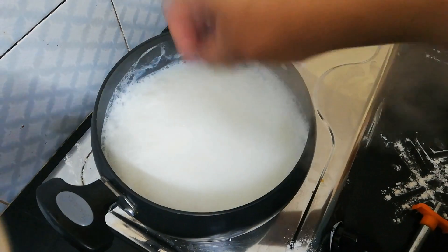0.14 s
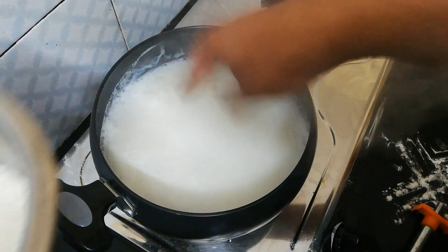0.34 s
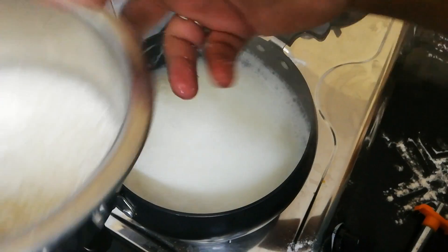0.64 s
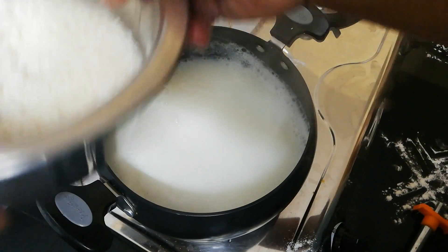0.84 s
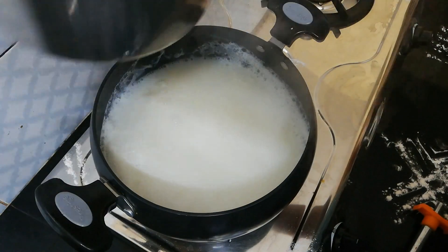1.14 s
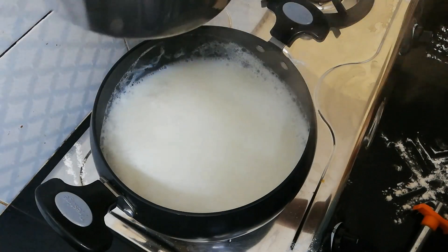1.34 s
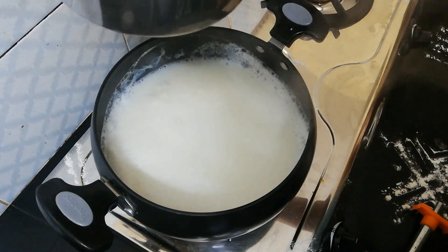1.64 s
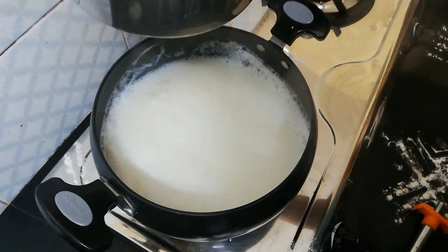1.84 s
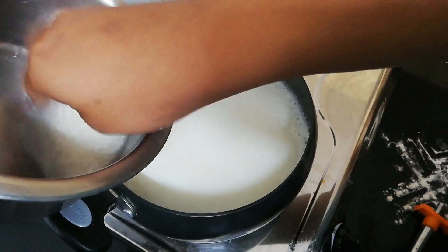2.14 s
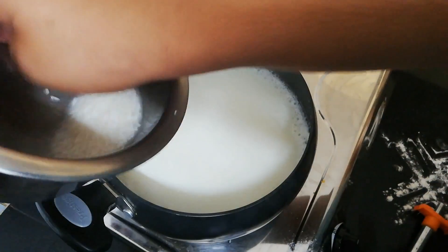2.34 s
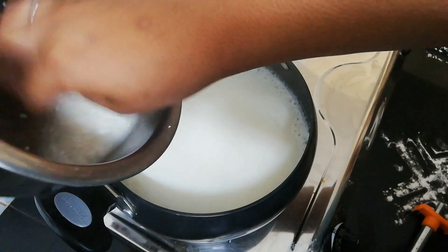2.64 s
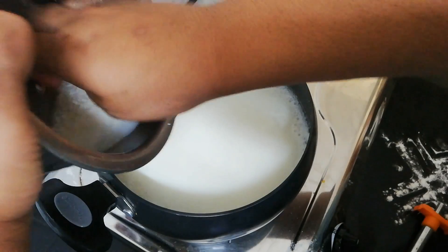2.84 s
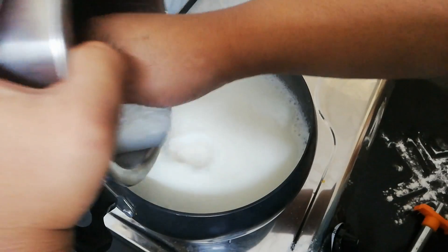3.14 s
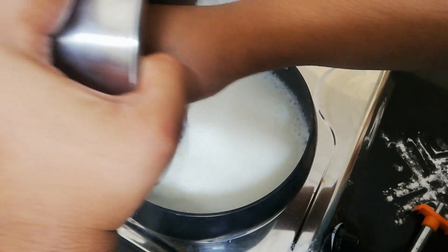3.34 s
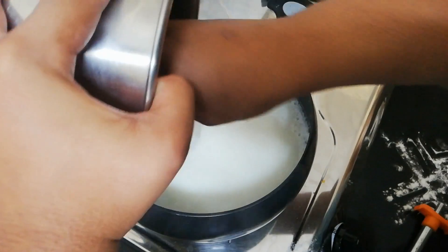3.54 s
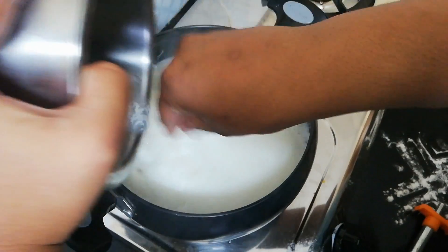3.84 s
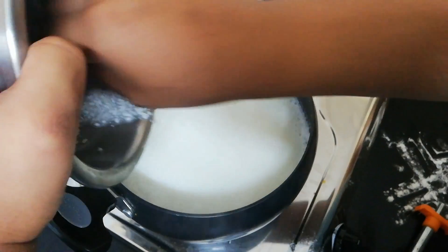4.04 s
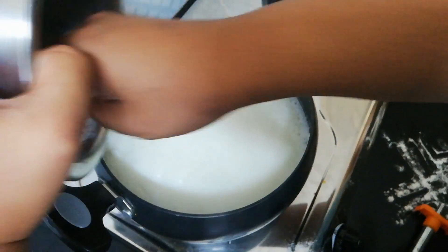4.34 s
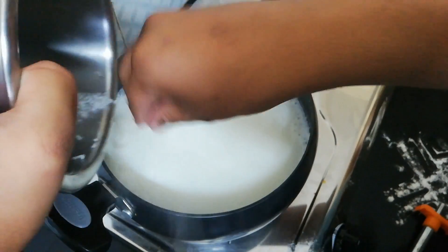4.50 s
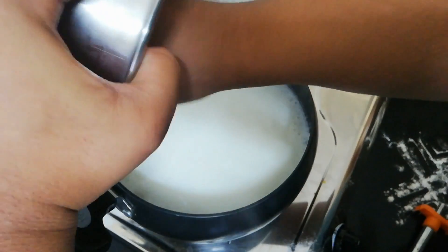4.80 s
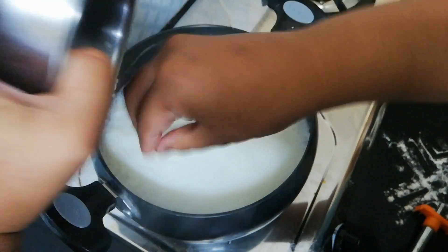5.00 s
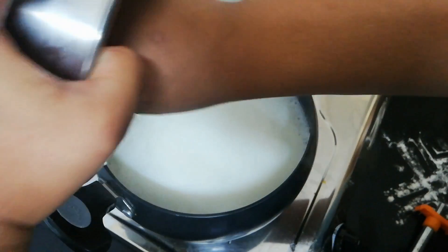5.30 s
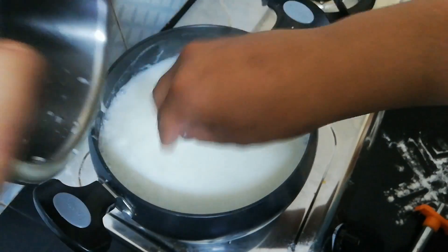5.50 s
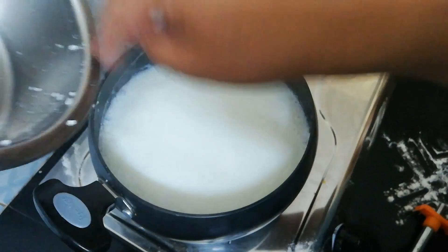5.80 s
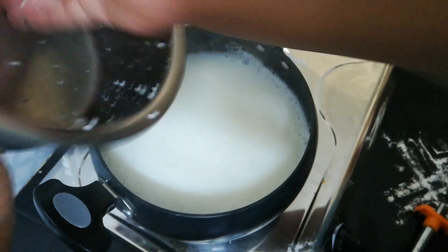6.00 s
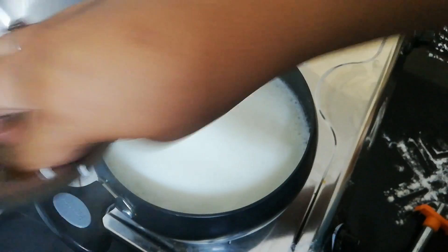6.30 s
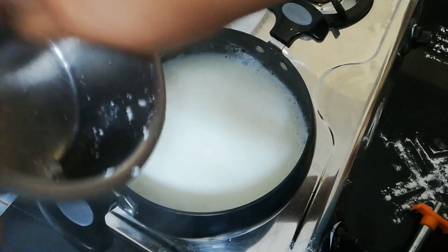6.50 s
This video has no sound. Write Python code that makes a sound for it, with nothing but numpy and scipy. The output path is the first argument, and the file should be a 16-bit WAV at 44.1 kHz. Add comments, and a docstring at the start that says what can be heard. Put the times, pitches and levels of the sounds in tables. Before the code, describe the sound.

A faint hiss fades over a low gas flame, and the sound cuts out for a moment, returning with a thump. Close by, wet rice is pushed by hand from a metal bowl into hot milk, squelching, crackling and plopping. Swishing finger scrapes, faint squeaks and a few ringing knocks on the bowl follow, with the light echo of a small kitchen and the burner growing stronger.

```python
"""Soaked rice, scooped by hand from a steel bowl into a pot of hot milk, smacks, plops and crackles.
Tearing wet films excite small cavities, trapped bubbles resonate, and parting grains snap.
Fingers drive the bowl by friction and knocks excite its modes; a gas burner rumbles underneath,
and the tiles of a small kitchen add reverberation.
A faint high hiss fades at the start; soon the sound drops out briefly and returns with a low thump."""
import sys
import numpy as np
from scipy import signal
from scipy.fft import rfft, irfft, next_fast_len
from scipy.io import wavfile

SR = 44100
rng = np.random.default_rng(int(sys.argv[2]) if len(sys.argv) > 2 else 0)


def unload_wav(signal):
    """Save mono or channel-first audio to the path in sys.argv[1] as 16-bit WAV at rate SR, clipped to [-1, 1]."""
    wavfile.write(
        sys.argv[1],
        SR,
        np.round(np.clip(np.atleast_2d(signal).T, -1, 1) * 32767).astype(np.int16),
    )


N = 293480
TIME = np.arange(N) / SR


def from_db(db):
    """The decibel law: 20 dB is a factor of ten in amplitude."""
    return 10 ** (np.asarray(db) / 20)


def panned(db, pan_db):
    """Level difference between the ears: left and right gains, pan_db being left minus right."""
    return from_db(db + np.array([[.5], [-.5]]) * pan_db)


def unit_rms(x):
    """Normalisation to unit mean power."""
    return x / np.sqrt(np.mean(x ** 2) + 1e-20)


def in_time(rows):
    """Linear interpolation of each column of a curve at every sample."""
    s, *columns = np.transpose(rows)
    return [np.interp(TIME, s, column) for column in columns]


def at_hz(points, hz):
    """Interpolation on a logarithmic frequency axis."""
    f, value = np.transpose(points)
    return np.interp(np.log(np.maximum(hz, 1)), np.log(f), value)


def add(track, s, sound):
    """Superposition: a short sound joins the track at time s."""
    i = round(s * SR)
    track[..., i:i + sound.shape[-1]] += sound[..., :N - i]


def resonate(x, hz, width_hz):
    """A damped two-pole resonator with unit peak gain."""
    r = np.exp(-np.pi * width_hz / SR)
    feedback = [1, -2 * r * np.cos(2 * np.pi * hz / SR), r * r]
    return signal.lfilter(np.array([1, 0, -1]) * (1 - r * r) / 2, feedback, x)


def band(x, hz, spread):
    """Band-pass filtering from hz / spread to hz * spread."""
    edges = [hz / spread, min(hz * spread, .45 * SR)]
    return signal.sosfilt(signal.butter(2, edges, "band", fs=SR, output="sos"), x)


def drift(per_s):
    """Random modulation: a wander of unit rms through per_s values a second."""
    knots = rng.standard_normal(int(per_s * N / SR) + 2)
    return unit_rms(np.interp(TIME * per_s, np.arange(len(knots)), knots))


def swell(s, length, attack_s, release_db_per_s):
    """An envelope with linear attack from time s and exponential decay from s + length."""
    age = np.maximum(TIME - s, 0)
    return np.minimum(age / attack_s, 1) * from_db(-release_db_per_s * np.maximum(age - length, 0))


def burst(t60):
    """Many tiny contacts sum to Gaussian noise, here decaying exponentially."""
    t = TIME[:SR // 5]
    return rng.standard_normal((2, len(t))) * from_db(-60 * t / t60)


def diffuse(pair, spectrum):
    """Partial coherence: two independent signals are coloured and blended, most alike in the bass."""
    # likeness of the two sides: (frequency [Hz], correlation [1])
    coherence = [(60, 1), (130, 0.88), (290, 0.8), (640, -0.6), (1400, 0.18), (3100, -0.091),
                 (7000, -0.071), (15000, 0.45)]
    size = next_fast_len(N)
    hz = np.arange(size // 2 + 1) * SR / size
    mid, side = rfft(pair, size) * from_db(at_hz(spectrum, hz))
    alike = at_hz(coherence, hz)
    side = side * np.sqrt((1 - alike) / (1 + alike))
    return unit_rms(irfft([mid + side, mid - side], size)[:, :N])


def lean(x):
    """A frequency-dependent level difference gives each side its own colour."""
    # stereo balance: (frequency [Hz], left minus right [dB])
    balance = [(100, 0.5), (400, -3), (900, -0.5), (2400, -0.5), (6000, 1.5), (10500, -5.5), (15000, -3.5)]
    size = next_fast_len(N)
    pan_db = at_hz(balance, np.arange(size // 2 + 1) * SR / size)
    return irfft(rfft(x, size) * panned(0, pan_db), size)[:, :N]


def from_right(x, lag_s):
    """Arrival-time difference: sound from the right reaches the left side later."""
    return np.array([np.interp(TIME - lag_s, TIME, x), x])


def room_air(level_db):
    """Ambient noise: the still kitchen is a diffuse field with a fine hiss on top."""
    # colour of the air: (frequency [Hz], relative spectral level [dB])
    spectrum = [(15, -17), (25, 8), (43, -7), (59, -5), (114, -2), (161, -16), (242, -7.5), (344, -13.5),
                (463, -11.5), (516, -21.5), (840, -15), (2280, -22), (7510, -25), (11000, -17),
                (16000, -38.5)]
    # its slow change: (time [s], relative level [dB])
    levels = [(0, -1), (2.1, 0), (3.1, -1.5), (6.65, -1.5)]
    return from_db(level_db + in_time(levels)[0]) * diffuse(rng.standard_normal((2, N)), spectrum)


def kitchen(x):
    """Reverberation: dense reflections off the tiles decay exponentially, fastest in the high treble."""
    # decay of the room: (frequency [Hz], reverberation time [s])
    t60 = [(200, 0.58), (1000, 0.43), (5000, 0.46), (14000, 0.16)]
    t, tail = TIME[:SR * 2 // 5], 0
    for hz in np.geomspace(200, 12800, 7):
        octave = band(rng.standard_normal((2, len(t))), hz, np.sqrt(2))
        tail = tail + octave * from_db(-60 * t / at_hz(t60, hz))
    tail = tail * (1 - np.exp(-t / 0.00031))
    return signal.oaconvolve(x, unit_rms(tail) / np.sqrt(len(t)), axes=1)[:, :N]


def burner(drone_hz, wander_hz, flutter_db, roar_hz, roar_db, rumble_hz, width_hz, rumble_db):
    """Combustion noise: the flame sings a deep wavering note in a soft roar and drives a resonance."""
    # strength of the flame: (time [s], drone level [dB], relative rumble level [dB])
    levels = [(0, -65, -69), (.35, -62, -61), (.85, -71.5, -70), (1.85, -63, -64.5), (2.2, -55.5, -63.5),
              (2.6, -64.5, -64.5), (2.92, -56, -61), (3.55, -63, -63), (3.85, -55, -52.5),
              (4.38, -45.5, -54.5), (4.62, -53, -55.5), (4.82, -47, -54), (5.24, -63, -48.5),
              (5.38, -40, -51.5), (5.85, -43.5, -52), (6.6, -37, -47.5)]
    deep_db, upper_db = in_time(levels)
    phase = 2 * np.pi * np.cumsum(drone_hz + wander_hz * drift(13)) / SR
    drone = unit_rms(np.sin(phase) * from_db(flutter_db * drift(20)))
    roar = from_db(roar_db) * unit_rms(band(rng.standard_normal(N), roar_hz, 1.9))
    rumble = resonate(rng.standard_normal(N), rumble_hz, width_hz)
    rumble = unit_rms(resonate(rumble, rumble_hz, 2 * width_hz))
    return from_db(deep_db) * (drone + roar) + from_db(upper_db + rumble_db) * rumble


def stove_top(level_db, waver_hz):
    """Plate vibration: low sheet-metal modes swell and die away as the bowl is lifted."""
    # modes of the stove top: (frequency [Hz], relative level [dB])
    modes = [(165, 3.5), (239, -9), (345, -3)]
    hum = sum(from_db(db) * np.sin(2 * np.pi * np.cumsum(hz + waver_hz * drift(39.6)) / SR)
              for hz, db in modes)
    lift = swell(s=0.338, length=0.064, attack_s=0.028, release_db_per_s=64)
    return from_db(level_db) * lift * unit_rms(hum)


def finger_wipes(level_db, end_fade_db):
    """Friction noise resonates between fingers and steel at a gliding pitch; narrow bands squeak."""
    # wipes: (time [s], length [s], relative level [dB], start pitch [Hz], end pitch [Hz], width [Hz])
    wipes = [(0.324, 0.048, -66.5, 3400, 3100, 500), (2.118, 0.11, -62.5, 4890, 5000, 2500),
             (2.14, 0.079, -63, 3170, 3040, 700), (3.164, 0.072, -59.5, 2300, 2270, 600),
             (3.231, .16, -56.5, 1276, 640, 400), (4.63, 0.095, -54, 1230, 1200, 129),
             (4.704, 0.16, -60.5, 2533, 2600, 450), (4.894, 0.17, -61, 2130, 2290, 220),
             (4.897, .21, -64.5, 1990, 1890, 130), (6.043, .018, -52.5, 3830, 3200, 300),
             (6.104, 0.15, -60.5, 2175, 2100, 181), (6.169, 0.19, -58, 2804, 2550, 810)]
    out = np.zeros((2, N))
    for s, length, db, start_hz, end_hz, width_hz in wipes:
        along = np.linspace(0, 1, int(length * SR))
        lowpass = signal.butter(2, width_hz / 2, fs=SR, output="sos")
        rub = signal.sosfilt(lowpass, rng.standard_normal((2, 2, len(along))))
        phase = 2 * np.pi * np.cumsum(start_hz + (end_hz - start_hz) * along) / SR
        envelope = from_db(level_db + db - end_fade_db * (2 * along - 1) ** 2)
        add(out, s, envelope * unit_rms(rub[0] * np.cos(phase) + rub[1] * np.sin(phase)))
    return out


def hiss_and_scrapes(level_db, judder_db, sag_db_per_s, sing_db, width_hz, waver_db):
    """Sliding friction: after a faint opening hiss, slipping wet grains swish and the steel sings."""
    # a high hiss fading away (first row), then finger scrapes: (time [s], length [s], relative level [dB])
    swishes = [(0, 0.64, -56), (0.311, 0.033, -58.5), (0.834, 0.033, -53.5), (2.106, 0.18, -54),
               (2.816, 0.15, -55), (4.183, 0.023, -37), (4.267, 0.043, -41.5), (4.32, 0.024, -48),
               (4.368, 0.017, -58), (4.456, .02, -58.5), (4.568, 0.06, -49.5), (4.846, 0.089, -46.5),
               (5.171, 0.075, -39.5), (5.362, .03, -58), (5.401, 0.028, -49.5), (6.024, 0.13, -52),
               (6.138, 0.26, -51), (6.451, 0.018, -50.5)]
    # colour of the swish: (frequency [Hz], relative spectral level [dB])
    spectrum = [(1500, -20), (3000, -12), (4600, -9), (5500, -3), (6600, -11), (7400, -3), (8400, 0),
                (10800, 1), (12500, -9), (16000, -25)]
    # high modes of the bowl, which come and go: (frequency [Hz])
    modes = [5420, 7400, 7970, 8930, 9400, 10140]
    envelope = 0
    for s, length, db in swishes:
        easing = from_db(db - sag_db_per_s * np.maximum(TIME - s, 0))
        envelope = envelope + easing * swell(s, length, attack_s=0.021, release_db_per_s=199)
    judder = from_db(level_db + judder_db * (drift(60) + drift(400)))
    swish = envelope * judder * diffuse(rng.standard_normal((2, N)), spectrum)
    singing = sum(resonate(swish, hz, width_hz) * from_db(waver_db * drift(30)) for hz in modes)
    return swish + from_db(sing_db) * singing


def bowl_knocks(level_db, damped_t60, swell_cycles, contact_t60, tick_db, tick_hz, rattle_db, lag_s):
    """Modal vibration: each blow ticks and excites the steel; the hand damps most, the rest rings on."""
    # modes of the bowl: (frequency [Hz], relative level [dB], time to decay by 60 dB [s])
    modes = [(374, -1, .3), (400, -2, .27), (525, 2, .12), (562, 5, .3), (632, -5, .36), (680, -7, .15),
             (716, -5, .4), (787, -6, .33), (828, -12, .33), (1136, -9, .1), (1400, -9, .22),
             (1500, -4, .14), (1545, -5, .28), (1965, -4, .13), (2170, -2, .08), (2480, 2, .15),
             (3095, -3, .15), (3284, -8, .2), (4160, -2, .14), (5475, 0, .12), (6160, 6, .2)]
    # centres of the deep, body, clang, bright and top groups of modes: (frequency [Hz])
    group_hz = [560, 660, 1520, 2000, 5400]
    # blows of hand and pot rim: (time [s], five relative group levels [dB], free ring [dB], pan [dB])
    knocks = [(.85, -66, -45, -62, -70, -74, -26, 4), (2.2993, -68, -64, -52, -43, -62, -20, 10),
              (2.317, -54, -30, -38, -26, -32.5, -32, 3.5), (2.348, -51, -53, -44, -53, -58, -23, 4),
              (2.697, -65, -43, -52, -59, -65, -26, -2), (4.1185, -51.5, -29.5, -33.5, -41, -62, -29, 2),
              (4.1341, -50, -31.5, -30.5, -43, -53, -19, -3.5),
              (4.7509, -57.5, -44, -34.5, -44, -61, -24, -1.5), (4.766, -72, -51, -39, -60, -74, -28, -2),
              (5.2321, -28, -14.5, -49, -40, -47, -16.5, -2.5), (5.2369, -30, -26, -33, -55, -60, -17, 0),
              (6.0321, -39.5, -34.5, -34, -45.5, -65, -11.5, 2), (6.055, -60, -35, -45.5, -55, -60, -12, 3),
              (6.082, -58, -45, -43, -48, -57, -21, 2)]
    out, t = np.zeros((2, N)), TIME[:SR * 2 // 5]
    hz, mode_db, t60 = np.transpose(modes)
    age = np.maximum(t - np.array([[lag_s], [0]]), 0)   # the right side hears it first
    tones = [np.sin(2 * np.pi * f * age) * (1 - np.exp(-f * age / swell_cycles)) for f in hz]
    rings = [tone * from_db(-60 * age / decay) for tone, decay in zip(tones, t60)]
    damped = from_db(-60 * age / damped_t60)
    for s, *groups_db, ring_db, pan_db in knocks:
        sides = panned(level_db, pan_db)
        gains = from_db(mode_db + np.interp(np.log(hz), np.log(group_hz), groups_db))
        tick = from_db(groups_db[3] + tick_db) * band(burst(contact_t60), tick_hz, 3.4)
        add(out, s, sides * tick)
        for f, gain, tone, ring in zip(hz, gains, tones, rings):
            free = rng.choice([-1, 1]) * from_db(ring_db) * ring
            add(out, s, gain * sides * (damped * tone + free))
            rattle = from_db(rattle_db) * resonate(burst(contact_t60), f, width_hz=f / 8)
            add(out, s, gain * sides * rattle)
    # the bowl's sound carries no bass below about 325 Hz
    return signal.sosfilt(signal.butter(6, 325, "high", fs=SR, output="sos"), out)


def ping_and_plops(level_db, swell_cycles, decay_cycles, rise, noise_db, lag_s):
    """Damped resonance: the bowl pings once, then bubbles in the milk ring, rise in pitch and splash."""
    # a bright ping from a light knock on the bowl (first row), then air pockets closing in the milk:
    # (time [s], relative level [dB], starting pitch [Hz])
    events = [(2.301, -27.5, 2400), (2.426, -35.5, 735), (2.88, -46, 667), (3.195, -41, 2110),
              (3.234, -30.5, 1190), (3.248, -46, 1140), (3.294, -46, 1170), (3.314, -35, 730),
              (3.35, -50, 1880), (3.384, -36.5, 706), (3.4465, -29, 602), (3.4475, -29.5, 780),
              (3.477, -37.5, 554), (3.505, -35, 845), (3.535, -32, 706), (3.575, -30.5, 683),
              (3.603, -44, 620), (3.635, -30.5, 750), (3.638, -33.5, 556), (3.697, -30.5, 810),
              (3.787, -30, 800), (3.79, -31.5, 1100), (3.921, -33.5, 1920), (3.955, -31.5, 844),
              (4.609, -35.5, 1850), (4.647, -37.5, 1340)]
    tones, noise, t = np.zeros(N), np.zeros((2, N)), TIME[:SR // 5]
    for s, db, hz in events:
        t60 = decay_cycles / hz
        envelope = (1 - np.exp(-(hz * t / swell_cycles) ** 2)) * from_db(-60 * t / t60)
        add(tones, s, from_db(db) * envelope * np.sin(2 * np.pi * hz * t * (1 + rise * t / t60)))
        add(noise, s, from_db(db + noise_db) * band(burst(2 * t60), hz, 1.5))
    return from_db(level_db) * (from_right(tones, lag_s) + noise)


def grains(per_s, spread_db, q, hollow_db, shifts_per_s):
    """A Poisson process of uneven snaps rings resonators; shifting hollows favour changing pitches."""
    out = np.zeros((2, N))
    pitches = np.geomspace(400, 12000, 16)
    for hz in pitches:
        gaps, strengths = rng.exponential(1, (8000, 2)).T
        onsets = (np.cumsum(gaps) * len(pitches) / per_s * SR).astype(int)
        sizes = from_db(spread_db * np.minimum(strengths, 4)) * (-1) ** np.arange(len(onsets))
        onsets, sizes = onsets[onsets < N], sizes[onsets < N]
        hollow = from_db(hollow_db * drift(shifts_per_s))
        for k in range(2):
            clicks = np.full(N, 1e-18)   # a tiny floor keeps the filter from underflowing
            clicks[onsets[k::2]] = sizes[k::2]
            out[k] += resonate(clicks * hollow, hz, hz / q)
    return out


def wet_rice(crackle_db, slosh_db, pops_db, clump_db):
    """Impulse noise: grains part with fine snaps and stir the milk, where small air pockets pop."""
    # colours of grains, milk and pops, each: (frequency [Hz], relative spectral level [dB])
    crackle_spectrum = [(1800, -19), (2800, -8), (4500, -6), (6500, -2), (8500, 1), (10800, -1),
                        (12500, -10), (16000, -24)]
    slosh_spectrum = [(150, -13), (350, 7.5), (700, -13.5), (1100, 9), (1500, 12), (2400, -6), (3500, 7),
                      (6000, -6.5), (12000, -1)]
    pop_spectrum = [(600, -6), (1300, 1), (2400, 3.5), (4500, 0), (6500, -10), (9000, -20), (14000, -32)]
    # the hand digs in, then the heap slides out: (time [s], relative crackle [dB], relative milk [dB])
    slides = [
        [(2.317, -45, -72), (2.322, -22.5, -54), (2.35, -58, -64), (2.43, -50.5, -55), (2.54, -52.5, -68.5),
         (2.72, -72, -86)],
        [(3.16, -60, -85), (3.23, -41.5, -68), (3.32, -49.5, -61), (3.36, -54, -68), (3.42, -42, -61),
         (3.51, -54, -54.5), (3.6, -51, -49), (3.645, -39, -49), (3.675, -46, -48.5), (3.725, -34, -58),
         (3.79, -49, -56.5), (3.86, -55, -61.5), (3.96, -64, -56.5), (4.08, -80, -75)],
    ]
    snaps = grains(per_s=8000, spread_db=-0.5, q=5.9, hollow_db=4.5, shifts_per_s=35)
    snaps *= from_db(clump_db * drift(70))
    pops = grains(per_s=260, spread_db=2.5, q=14, hollow_db=4.5, shifts_per_s=12)
    crackle = from_db(crackle_db) * diffuse(snaps, crackle_spectrum)
    milk = from_db(slosh_db) * diffuse(snaps, slosh_spectrum)
    milk += from_db(pops_db) * diffuse(pops, pop_spectrum)
    out = np.zeros((2, N))
    for slide in slides:
        grain_db, milk_db = in_time(slide)
        moving = (TIME > slide[0][0]) * (TIME < slide[-1][0])
        out += moving * (from_db(grain_db) * crackle + from_db(milk_db) * milk)
    return out


def smacks(level_db, tear_s, snap_t60, spray_db, spray_t60, width_hz, skirt_db, body_db, body_hz):
    """Cavity resonance: a wet film tears and rings its hollow over a duller body; fine spray follows."""
    # wet clumps smacking: (time [s], relative level [dB], cavity resonance [Hz], pan [dB])
    clumps = [(2.103, -34.5, 8900, -2), (2.3165, -25, 6000, -10), (2.3194, -13, 9350, 1),
              (2.517, -32, 11000, -3), (3.197, -37.5, 8500, -16), (3.2082, -31.5, 4730, -5),
              (3.235, -25, 5330, -5), (3.2385, -29.5, 9350, -14), (3.2915, -23.5, 6200, -4),
              (3.2977, -29.5, 9300, -6), (3.3758, -34.5, 3930, -1), (3.388, -26, 6450, -10.5),
              (3.412, -33.5, 9450, -13), (3.446, -36.5, 11000, -14), (3.501, -30, 4530, -5),
              (3.503, -37, 9500, -10), (3.528, -24.5, 11300, -8), (3.5285, -30, 4340, -4),
              (3.545, -38, 2200, -10), (3.576, -32.5, 4930, -10), (3.6115, -26.5, 7200, -9),
              (3.6341, -37, 2910, -4), (3.6359, -18, 7000, 0), (3.647, -31, 4620, -3),
              (3.693, -22, 9500, -4), (3.696, -16, 10600, -10), (3.6993, -24, 2580, 1.5),
              (3.705, -19, 7100, -5.5), (3.735, -13.5, 7460, -2.5), (3.777, -26, 9900, -9),
              (3.7856, -23.5, 7600, 2), (3.8126, -25.5, 11400, -11), (3.8902, -26, 5500, -3),
              (3.8894, -32, 10200, -17), (3.9235, -20, 9000, -4), (3.955, -31.5, 5800, -5),
              (3.964, -26.5, 11400, -9), (4.028, -39.5, 6460, -3), (4.0916, -27.5, 6200, 0),
              (4.135, -33.5, 10100, -6), (4.1881, -17.5, 8900, -1), (4.207, -24, 10700, -10),
              (4.2492, -28, 10500, -5), (4.595, -28, 10440, -14), (4.595, -32.5, 5670, -3),
              (4.645, -32.5, 9300, -2), (4.751, -38, 10200, -4), (5.011, -39.5, 9630, -5.5),
              (5.182, -25.5, 9900, -7), (6.1668, -22.5, 7100, 2.5), (6.308, -30, 9100, 4)]
    out = np.zeros((2, N))
    opening = 1 - np.exp(-TIME[:SR // 5] / tear_s)
    for s, db, hz, pan_db in clumps:
        snap = opening * (burst(snap_t60) + from_db(spray_db) * burst(spray_t60))
        cavity = resonate(resonate(snap, hz, width_hz), hz, 3 * width_hz)
        skirt = from_db(skirt_db) * band(snap, hz, 1.88)
        body = from_db(body_db) * band(snap, body_hz, 1.65)
        add(out, s, (cavity + skirt + body) * panned(level_db + db, pan_db))
    return signal.sosfilt(signal.butter(3, 12400, fs=SR, output="sos"), out)


def scene():
    """Superposition of direct and reverberant sound: rice, milk and bowl over the burner and the air."""
    snaps = smacks(level_db=7.5, tear_s=0.00063, snap_t60=0.014, spray_db=-9, spray_t60=0.035,
                   width_hz=1130, skirt_db=-8, body_db=-21.5, body_hz=2450)
    plops = ping_and_plops(level_db=10, swell_cycles=1.67, decay_cycles=12, rise=0.06,
                           noise_db=-6, lag_s=0.00039)
    knocks = bowl_knocks(level_db=-1.5, damped_t60=0.052, swell_cycles=0.3, contact_t60=0.07,
                         tick_db=2, tick_hz=3360, rattle_db=-1.5, lag_s=0.00062)
    rice = wet_rice(crackle_db=-1, slosh_db=2, pops_db=-3.5, clump_db=0.5)
    swish = hiss_and_scrapes(level_db=-1.5, judder_db=2, sag_db_per_s=30,
                             sing_db=-14.5, width_hz=29, waver_db=-1)
    rubs = finger_wipes(level_db=3, end_fade_db=9)
    air = room_air(level_db=-57)
    stove = burner(drone_hz=70.6, wander_hz=1.5, flutter_db=-0.5, roar_hz=55.5, roar_db=-13.5,
                   rumble_hz=108.9, width_hz=19.1, rumble_db=2)
    stove += stove_top(level_db=-52.5, waver_hz=4.7)
    room = kitchen(from_db(-8.5) * snaps + from_db(-7.5) * (plops + knocks) + from_db(-8) * rubs)
    coloured = lean(plops + knocks + rice + swish + rubs + air + room)
    return snaps + coloured + from_right(stove, lag_s=0.00036)


def record(dry, stop_s=1.833, restart_s=2.049, thump=0.028, thump_s=0.13, cutoff_hz=16000):
    """Gating: the sound drops out and returns with a decaying step, a thump; all is then low-passed."""
    step = -thump * np.exp(-np.maximum(TIME - restart_s, 0) / thump_s) * (TIME >= restart_s)
    gate = (TIME < stop_s) | (TIME >= restart_s)
    return signal.sosfilt(signal.ellip(10, .1, 80, cutoff_hz, fs=SR, output="sos"), dry * gate + step)


dry = scene()
out = record(dry)
unload_wav(out)
```